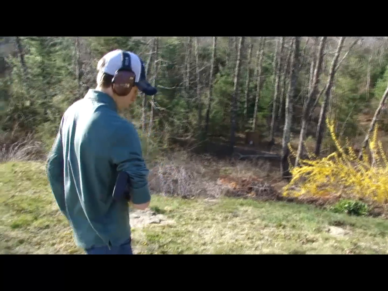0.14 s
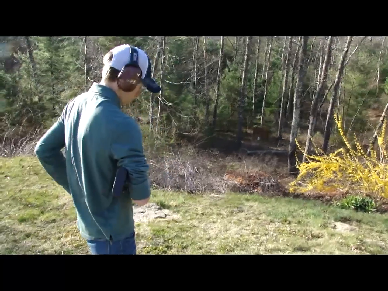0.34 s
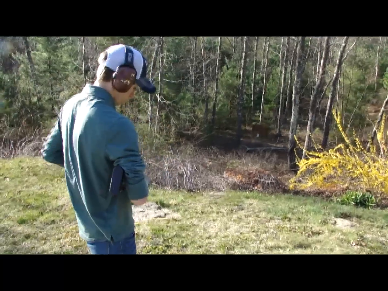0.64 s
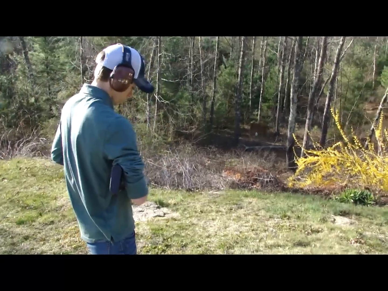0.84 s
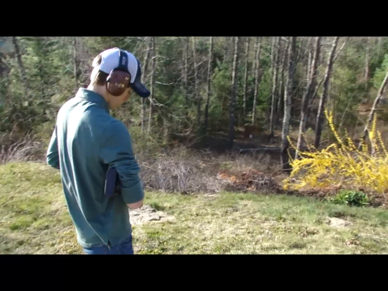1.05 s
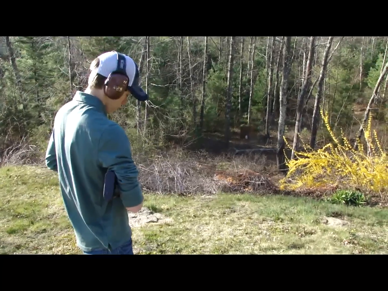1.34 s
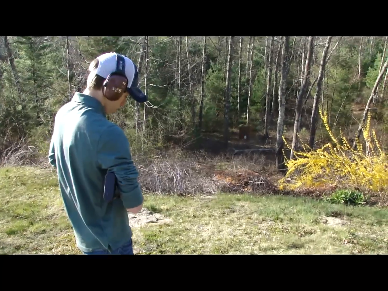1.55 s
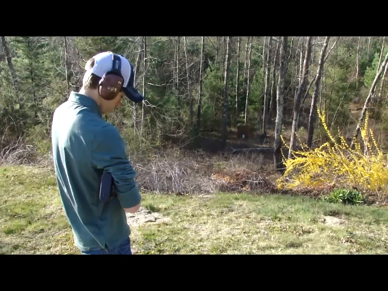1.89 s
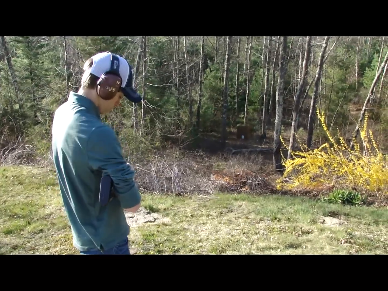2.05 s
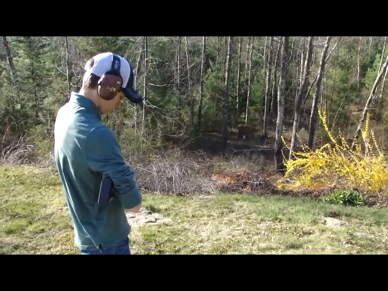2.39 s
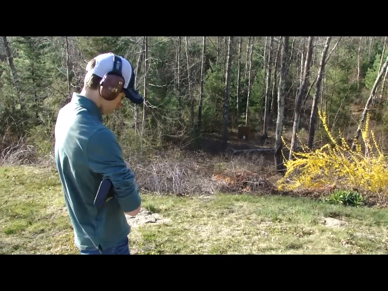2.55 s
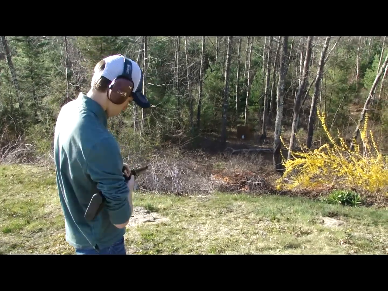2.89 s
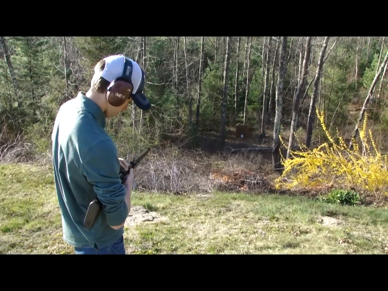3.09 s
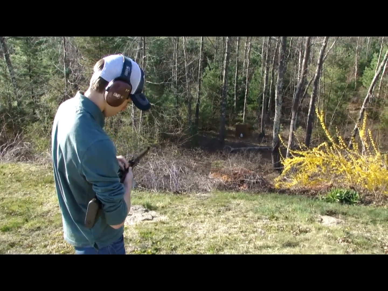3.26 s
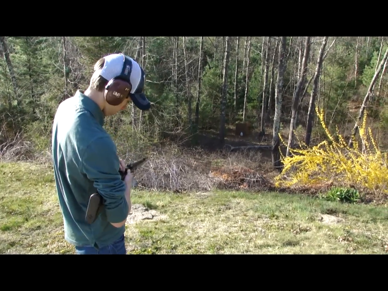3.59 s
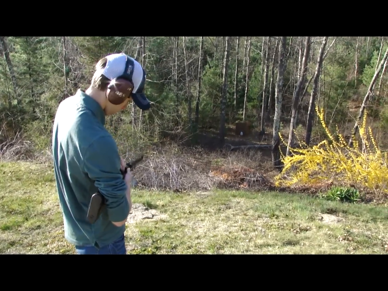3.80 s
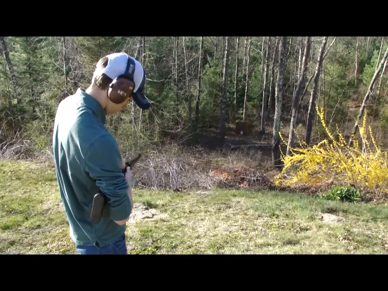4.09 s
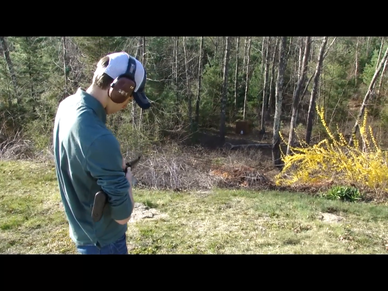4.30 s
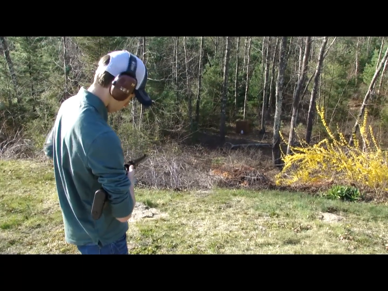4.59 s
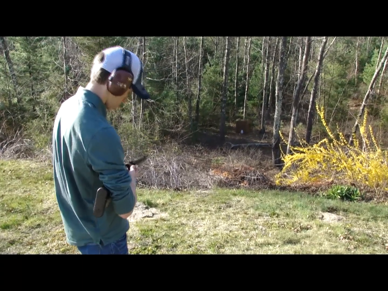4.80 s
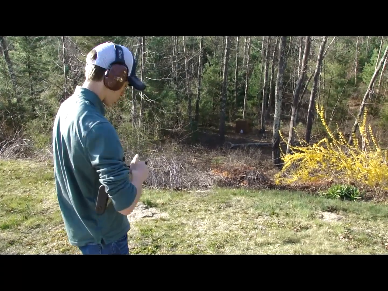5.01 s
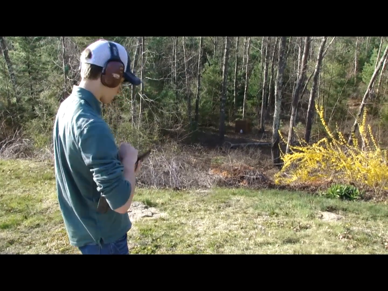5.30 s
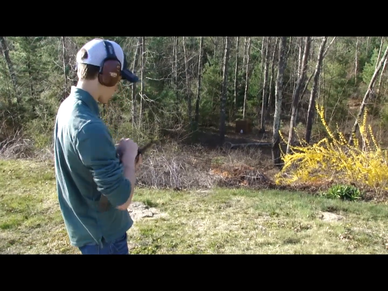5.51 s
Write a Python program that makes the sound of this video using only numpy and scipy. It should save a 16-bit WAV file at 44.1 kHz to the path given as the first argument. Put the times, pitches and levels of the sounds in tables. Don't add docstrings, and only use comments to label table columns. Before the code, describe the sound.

Sparse steel clicks, sliding metal and a soft cloth rub over quiet woodland hiss, ending in a sudden forceful bolt slam.

```python
import sys
import numpy as np
from scipy import signal
from scipy.fft import rfft, irfft
from scipy.io import wavfile
from scipy.ndimage import uniform_filter1d

SR = 44100
rng = np.random.default_rng(int(sys.argv[2]) if len(sys.argv) > 2 else 0)


def generate_wav(signal):
    frames = np.transpose(np.atleast_2d(signal))
    scaled = np.clip(frames, -1, 1) * 32767
    pcm = np.round(scaled).astype(np.int16)
    wavfile.write(sys.argv[1], SR, pcm)


def attenuation_scalar(level_db):
    decades = np.asarray(level_db, float) / 20
    return 10 ** decades


N = 249165

# frequency in Hz, level in dB per Hz.
AIR_SPECTRUM = [(25, -29), (80, -15.5), (180, -4), (520, -0.5), (2070, -8.5), (4990, -13.5), (11200, -19.5),
                (12100, -35)]
# frequency in Hz, correlation from 0 to 1.
AIR_LIKENESS = [(60, 0.218), (140, 0.37), (350, 0.2), (840, 0.2), (2020, 0.062), (4860, 0.51),
                (11700, 0.58)]
# frequency in Hz, left minus right in dB.
AIR_BALANCE = [(60, 1.0), (170, -0.14), (490, -1.128), (1420, -1.6), (4080, -0.679), (11700, 0.094)]
AIR_DB, AIR_SETTLE_DB, AIR_SETTLE_S = -53.5, 1.3, 0.99

# frequency in Hz, width in Hz, level in dB.
BODY_MODES = [(996, 35, 6.5), (1420, 46.3, -5.5), (1700, 57, 0.5), (1920, 63, -8), (2450, 67, -19),
              (2770, 160, -13), (3420, 49, -12.5), (4100, 32, -29)]
# frequency in Hz, width in Hz, level in dB.
ACTION_MODES = [(848, 47, 14.5), (1450, 92, -2), (2300, 200, 9.5), (2580, 44, -17), (3000, 17, 6),
                (3500, 27, -15), (3520, 40, 1.5), (3820, 31, -7), (4230, 23, -9), (4330, 140, -16)]
# frequency in Hz, width in Hz, level in dB.
SHEEN_MODES = [(5700, 230, -7), (7100, 470, -30), (8800, 1000, -22), (10200, 530, -18)]

# peak time in seconds, rise in seconds, fall in seconds, level in dB,
# brightness in dB per octave. Rise and fall each span STROKE_DB.
SLIDES = [(.146, 0.27, 0.22, -62, -15), (0.301, .1, .01, -60, 4), (1.14, 0.028, 0.016, -49, -15),
          (1.212, .03, 0.032, -44, 2), (1.55, 0.059, 0.086, -48.5, -5), (1.579, 0.063, 0.051, -47, -4),
          (1.858, .012, 0.13, -51.5, -20), (1.905, .1, .02, -56, 12), (1.918, .012, 0.038, -45.5, -11),
          (2.65, 0.16, .15, -53, -1), (2.718, .04, 0.13, -53.5, -14), (2.852, .006, .06, -53, 4),
          (3.13, .25, .03, -60, 13), (3.148, .01, 0.058, -45, -3), (3.254, .008, 0.057, -53, -7),
          (4.11, .02, .014, -42.5, 3), (4.128, 0.0071, 0.028, -36, 6), (5.279, 0.066, .08, -57, -8),
          (5.33, .04, .02, -41.5, -3)]
STROKE_DB = 21
# time in seconds, level in dB.
RUN_HOME = [
    (5.49, -68),
    (5.585, -36),
    (5.59, -17.5),
    (5.601, -35.5),
    (5.624, -23),
    (5.65, -25),
]
RUN_HOME_TILT = 2.5

# start in seconds, peak in dB, low ring in Hz, high ring in Hz,
# high minus low ring in dB.
CLACKS = [(.1405, -40, 1010, 2530, -25), (1.204, -34, 1700, 2080, -2), (1.3968, -21, 2030, 1920, 15),
          (1.4013, -30, 1000, 3236, 0.5), (1.4037, -34.5, 1420, 3040, -1), (1.4107, -32, 1500, 2490, -6),
          (1.4153, -39, 1240, 2959, -2), (1.7106, -35.5, 1644, 2710, 9), (1.7165, -42.5, 1521, 4500, 4),
          (2.6434, -37.5, 890, 2100, -15.5), (2.6692, -45, 990, 2860, 0), (2.9354, -40.5, 1139, 3600, -1),
          (3.1477, -35, 1420, 3000, 7), (3.901, -40, 1078, 1940, -2), (3.9332, -23, 1638, 2930, 10),
          (3.9365, -22.5, 1675, 2600, 12), (3.9411, -37, 1740, 2560, -1), (4.113, -30.5, 780, 2265, -16),
          (4.1206, -45, 760, 3120, -11), (5.3161, -39, 960, 2150, 2), (5.3125, -41, 1560, 2000, 0),
          (5.5238, -38, 1500, 2100, 2), (5.3263, -27.5, 1410, 3282, 3)]
# start in seconds, peak in dB, low ring in Hz, high ring in Hz,
# high minus low ring in dB.
SNAPS = [(1.1331, -44, 1291, 2400, -3), (1.2101, -35, 1150, 3500, 3), (1.3626, -38.5, 1630, 2584, 2.5),
         (1.395, -24.5, 1420, 4050, 26), (1.8911, -39, 850, 2520, 5), (1.9164, -36.5, 1650, 3400, -8),
         (2.8545, -42, 1570, 3000, 9.5), (2.9305, -45.5, 988, 5300, 6), (2.9308, -35, 1150, 3500, 6),
         (3.0704, -42.5, 1160, 3030, -2), (3.1495, -28, 1240, 3280, -6), (3.9295, -30, 1330, 3000, 3),
         (3.9325, -27.5, 1280, 6040, 18), (4.1082, -31.5, 812, 2220, -2.5), (4.128, -22, 1830, 2490, 6),
         (4.1367, -33, 1455, 3280, 7.5), (4.1409, -33, 1460, 3240, 8), (4.8693, -42.5, 859, 1870, 0),
         (5.3298, -26, 1450, 2130, -0.5)]
CLACK_TREBLE_DB, SNAP_TREBLE_DB, RATTLE_TREBLE_DB = -40, -26, -38
EDGE_DB_PER_DB = 0.7451
ACTION_DB, ACTION_DB_PER_DB = -5, 0.26
STOCK_DB, STOCK_DB_PER_DB = -14, 0.3956

# time in seconds, level in dB.
RUB = [
    (0.39, -70),
    (0.412, -54),
    (0.478, -47),
    (0.5, -42),
    (0.528, -51.5),
    (0.6, -67),
]
# frequency in Hz, level in dB.
RUB_COLOUR = [(100, -15), (280, 0.5), (700, -5), (1500, -8), (3000, -19), (6000, -30), (12000, -36)]
# start in seconds, peak in dB, ring in Hz.
KNOCKS = [(0.406, -34.5, 795.5), (0.41, -33.5, 720), (0.426, -33, 710), (0.438, -31, 690),
          (0.446, -35, 754), (0.451, -44, 513.8), (0.486, -41, 1150), (0.486, -35, 680), (0.5, -31, 289.3),
          (0.508, -46, 250), (0.513, -50, 474)]
# start in seconds, length in seconds, level in dB, band centre in Hz.
SCUFFS = [
    (2.6, 0.088, -63, 4670),
    (3, .08, -74, 3340),
    (3.05, .1, -63, 4200),
    (1.4, .04, -68.5, 3300),
    (4.13, 0.027, -61, 3000),
    (3.925, .03, -57, 2800),
    (3.928, .012, -46.5, 9160),
    (4.126, 0.0091, -46, 10100),
    (4.106, .01, -56, 9000),
    (.49, .025, -59, 2000),
]

# centre in seconds, peak in dB.
GUSTS = [(0.67, -42), (.96, -40.5), (2.102, -43), (2.121, -42), (2.137, -28), (2.143, -37), (2.15, -24.5),
         (2.156, -36), (2.167, -42), (2.179, -26), (2.199, -36), (2.579, -40.5), (3.1, -44), (3.112, -39),
         (3.146, -42.5), (3.16, -43), (3.175, -31), (3.183, -33.5), (3.21, -39), (3.229, -46.5),
         (3.25, -42)]
EDDY_HZ, EDDY_HZ_PER_DB = 183, 5.5

# start in seconds, length in seconds, first level in dB, last level in dB,
# low ring in Hz.
RATTLES = [(1.206, 0.0055, -46, -46, 1090), (1.544, 0.012, -35, -51, 1700),
           (1.559, 0.019, -42.5, -37, 1610), (1.596, .006, -48, -48, 1300), (1.919, 0.0078, -42, -43, 1005),
           (3.1577, .012, -38.5, -42, 950), (3.168, .011, -41, -43, 1250), (3.2535, .006, -44, -46, 1200),
           (3.945, .003, -38, -44, 1617), (4.142, .009, -41.5, -42, 750), (5.334, 0.013, -32, -50, 1460),
           (5.5136, 0.042, -39, -43, 1490), (5.554, .032, -30.5, -25, 1380)]
BOUNCE_S, BOUNCE_SPREAD_DB = .0042, 4.5
RATTLE_HIGH_HZ, RATTLE_HIGH_DB = 2150, -4.5

# start in seconds, peak in dB, high ring in Hz, high minus low ring in dB,
# treble crack in dB.
SLAMS = [(5.5728, -24, 2240, -4, -17), (5.5884, -11.5, 2600, 0.5, -10.5), (5.597, -19, 4400, -6, -27),
         (5.6074, -17.5, 1910, -13, -28), (5.6138, -17, 1898, -13, -23), (5.6197, -5.5, 1930, 3, -28),
         (5.6228, -9.5, 2700, 3, -30), (5.627, -11, 2855, -5, -23), (5.6324, -17, 4000, -1, -10),
         (5.6353, 0, 2610, 31, -23), (5.6387, -6.5, 2073, -3, -18), (5.6438, -13, 2406, -7, -26),
         (5.6465, -1, 2330, -7, -25)]
RECEIVER_HZ = 1360


def evened(x):
    return x / np.sqrt(np.mean(x ** 2) + 1e-20)


def peaked(x):
    return x / abs(x).max()


def read(points, hz):
    f, value = np.transpose(points)
    return np.interp(np.log(hz + 1), np.log(f + 1), value)


def add(mix, s, sound):
    part = mix[round(s * SR):][:len(sound)]
    part += sound[:len(part)]


def ring(x, hz, width):
    r = np.exp(-np.pi * width / SR)
    poles = [1, -2 * r * np.cos(2 * np.pi * hz / SR), r * r]
    return signal.lfilter([(1 - r * r) / 2, 0, (r * r - 1) / 2], poles, x)


def grit(count, per_s, spread_db):
    chance, size, sign = rng.random((count, 3)).T
    height = attenuation_scalar(-spread_db * np.log(size + 0.000914))
    return (chance < per_s / SR) * height * np.sign(sign - .5)


def air():
    frames, hz = N // 256 + 5, np.fft.rfftfreq(1024, 1 / SR)
    a, b, c, d, patches = rng.standard_normal((frames, 513, 5)).T
    patches = evened(uniform_filter1d(uniform_filter1d(patches, 10, 0), 12, 1))
    flutter = evened(uniform_filter1d(rng.standard_normal((2, 1, frames)), 9))
    same = np.clip(read(AIR_LIKENESS, hz), 0, 1)[:, None]
    left = a + 1j * b
    right = same * left + np.sqrt(1 - same ** 2) * (c + 1j * d)
    balance = read(AIR_BALANCE, hz) * np.array([[.5], [-.5]])
    colour_db = (read(AIR_SPECTRUM, hz) + balance)[:, :, None]
    flutter_db = 2.0 * flutter / (1 + (hz[:, None] / 150) ** 2)
    z = np.array([left, right]) * attenuation_scalar(colour_db + 1.22 * patches + flutter_db)
    hiss = evened(signal.istft(z, nperseg=1024, noverlap=768)[1][:, :N])
    return attenuation_scalar(AIR_DB + AIR_SETTLE_DB * np.exp(-np.arange(N) / SR / AIR_SETTLE_S)) * hiss


def thinned(x):
    pair = np.array([[1, 0.96], [1, -0.95197]]) / np.sqrt(2)
    frame = dict(fs=SR, window="cosine", nperseg=2048, noverlap=1024)
    offset = 191
    hz, t, z = signal.stft(np.roll(pair @ x, -offset, axis=1), **frame)
    fine, wide = rng.standard_normal((2,) + z.shape)
    fine = evened(uniform_filter1d(uniform_filter1d(fine, size=3, axis=1), size=2, axis=2))
    wide = evened(uniform_filter1d(uniform_filter1d(wide, size=7, axis=1), size=3, axis=2))
    treble = np.clip((hz[:, None] - 1200) / 3600, 0, 1)
    dropped = (fine > 2.3 - 1.9 * treble) | (wide > 2.6 - 1.85 * treble)
    z = z * np.where(dropped, attenuation_scalar(-35), 1)
    return pair @ np.roll(signal.istft(z, **frame)[1][:, :N], offset, axis=1)


def stroke(peak_s, rise_s, fall_s, db, tilt):
    reach = .12001
    return [(peak_s - reach, db - STROKE_DB * reach / rise_s, tilt), (peak_s, db, tilt),
            (peak_s + reach, db - STROKE_DB * reach / fall_s, tilt)]


def slide(rows, modes, per_s, widen, top_hz):
    s, db, tilt = np.transpose(rows)
    t = np.arange(s[0], s[-1], 1 / SR)
    drive = grit(len(t), per_s, spread_db=1.5)
    tilt = np.interp(t, s, tilt)
    sound = sum(attenuation_scalar(d + tilt * np.log2(f / 1500)) * ring(drive, f, w * widen) for f, w, d in modes)
    sound = ring(sound, 1640, top_hz)
    sound = sound / np.sqrt(uniform_filter1d(sound ** 2, 1500) + 1e-12)
    onset = np.minimum((t - s[0]) / 0.00834, 1)
    return s[0], attenuation_scalar(np.interp(t, s, db) - 2.5) * sound * onset


def click(s, db, low_hz, high_hz, high_db, treble_db):
    t = np.arange(2000) / SR
    chatter = rng.standard_normal(len(t)) * np.exp(-t / 0.00089) * np.minimum(t / 0.00022, 1)
    chatter[12] += 1.6
    damping = 1.5 + max(db + 35, 0) / 25
    low = peaked(ring(ring(chatter, low_hz, 110 * damping), low_hz, 1530))
    high = peaked(ring(ring(chatter, high_hz, 280 * damping), high_hz, 1300))
    pair = attenuation_scalar(min(-high_db, 0)) * low + attenuation_scalar(min(high_db, 0)) * high

    action = sum(attenuation_scalar(d) * ring(chatter, f, 162) for f, w, d in ACTION_MODES[1:])
    action = peaked(ring(action, 2100, 5300))
    stock = peaked(ring(ring(chatter, ACTION_MODES[0][0], 170), 970, 860))
    action = action + attenuation_scalar(STOCK_DB + STOCK_DB_PER_DB * (db + 15)) * stock

    snap = peaked(ring(ring(chatter, 3100, 6000), 5200, 9300))
    sheen = sum(ring(chatter, f * rng.uniform(0.95, 1.1), w) for f, w, d in SHEEN_MODES)
    snap = ring(snap + 0.53 * peaked(sheen), 7200, 9300)
    snap = snap * attenuation_scalar(min(db + 40, 0) * .45)

    push = peaked(ring(chatter, 130.0, 160))
    sound = 0.65 * pair + attenuation_scalar(ACTION_DB + ACTION_DB_PER_DB * min(db + 22, 0)) * action
    sound = sound + attenuation_scalar(treble_db + 12) * snap + attenuation_scalar(-33.0) * push
    return s - .0003, attenuation_scalar(db) * sound


def clack(s, db, *rings):
    return click(s, db, *rings, CLACK_TREBLE_DB)


def rub():
    s, db = np.transpose(RUB)
    t = np.arange(s[0], s[-1], 1 / SR)
    colour = attenuation_scalar(read(RUB_COLOUR, np.fft.rfftfreq(len(t), 1 / SR)))
    sound = irfft(rfft(grit(len(t), 6000., spread_db=4.0)) * colour, len(t))
    return s[0], attenuation_scalar(np.interp(t, s, db) - 3.5) * evened(sound)


def knock(s, db, hz):
    t = np.arange(1500) / SR
    blow = rng.standard_normal(len(t)) * np.exp(-t / 0.0027)
    return s, attenuation_scalar(db - 5.5) * peaked(ring(ring(blow, hz, 140), hz, 1100))


def scuff(s, length, db, hz):
    drive = grit(round(length * SR), per_s=6000., spread_db=4.0)
    band = evened(ring(ring(drive, hz, 816), hz, 1400))
    return s, attenuation_scalar(db) * band * signal.windows.tukey(len(drive), .6)


def gusts():
    out, t = np.zeros(N), np.arange(-600, 600) / SR
    for s, db in GUSTS:
        hz = EDDY_HZ + EDDY_HZ_PER_DB * (db + 39)
        u = (np.pi * .8 * hz * t) ** 2
        skew = rng.uniform(-0.27, 0.2667) * np.pi * hz * t
        add(out, s + t[0], attenuation_scalar(db) * (1 - 2 * u + skew) * np.exp(-u))
    return out * np.array([[1], [-.17]])


def snap(s, db, *rings):
    return click(s, db, *rings, SNAP_TREBLE_DB + EDGE_DB_PER_DB * (db + 35))


def rattle(start, length, first_db, last_db, low_hz):
    for k, (late, size, low, high, mix) in enumerate(rng.uniform(-1, 1, (9, 5))):
        after = (k + 0.24 * late * (k > 0)) * BOUNCE_S
        db = first_db + (last_db - first_db) * min(after / length, 1) + BOUNCE_SPREAD_DB * size
        s, sound = click(start + after, db, low_hz * (1 + 0.071 * low), RATTLE_HIGH_HZ * (1 + .15 * high),
                         RATTLE_HIGH_DB + 6 * mix, RATTLE_TREBLE_DB)
        yield s, sound * (after < length)


def slam(s, db, *colour):
    return click(s, db, RECEIVER_HZ, *colour)


def outdoors(x):
    t = np.arange(9000) / SR
    near = rng.standard_normal((2, len(t))) * np.exp(-t / 0.0051) * (t > .001)
    trees = rng.standard_normal((2, len(t))) * np.exp(-t / 0.047) * (t > .012)
    tail = attenuation_scalar(-8) * near / np.linalg.norm(near[0]) + attenuation_scalar(-25) * trees / np.linalg.norm(trees[0])
    return signal.oaconvolve(x[None], tail, axes=1)[:, :N]


def scene():
    rifle, hand = np.zeros(N), np.zeros(N)
    background = thinned(air()) + gusts()
    for row in SLIDES:
        add(rifle, *slide(stroke(*row), BODY_MODES, 2500., 0.86, top_hz=4500))
    for row in CLACKS:
        add(rifle, *clack(*row))
    add(hand, *rub())
    for row in KNOCKS:
        add(hand, *knock(*row))
    for row in SCUFFS:
        add(rifle, *scuff(*row))
    for row in SNAPS:
        add(rifle, *snap(*row))
    for row in RATTLES:
        for bounce in rattle(*row):
            add(rifle, *bounce)
    last_push = [(*row, RUN_HOME_TILT) for row in RUN_HOME]
    add(rifle, *slide(last_push, ACTION_MODES + SHEEN_MODES, 2500., 3.3, top_hz=8896))
    for row in SLAMS:
        add(rifle, *slam(*row))
    near = rifle * attenuation_scalar(np.array([[.6], [-.6]])) + hand * attenuation_scalar(np.array([[1.3], [-1.3]]))
    return near + outdoors(rifle + hand) + background


def roll_off(x):
    return signal.sosfilt(signal.butter(12, 12300, fs=SR, output="sos"), x)


def record(dry):
    cut = signal.sosfilt(signal.butter(2, 70, "high", fs=SR, output="sos"), dry)
    cut = signal.sosfilt(signal.butter(10, 11700, fs=SR, output="sos"), cut)
    mix = cut / (1 + abs(cut) ** 4) ** .25
    return roll_off(mix)


dry = scene()
out = record(dry)
generate_wav(out)
```